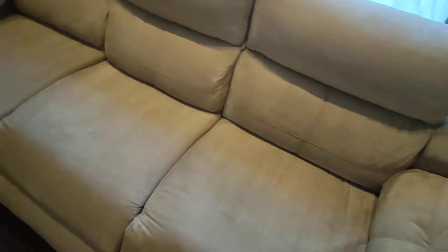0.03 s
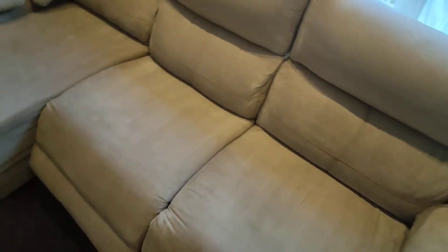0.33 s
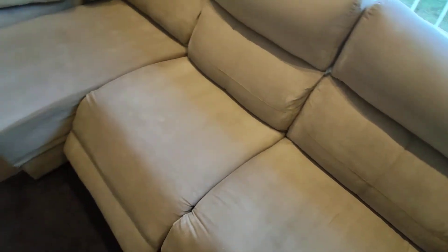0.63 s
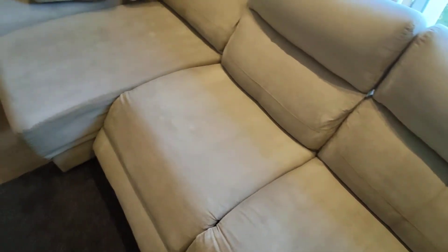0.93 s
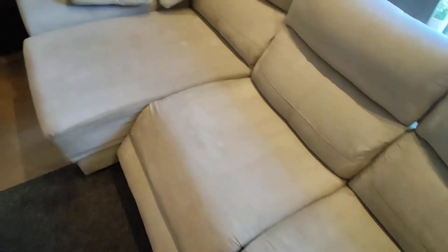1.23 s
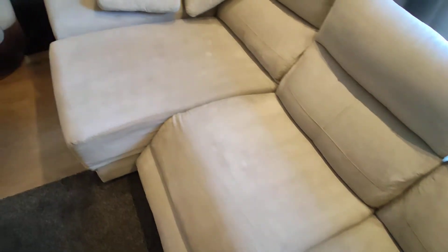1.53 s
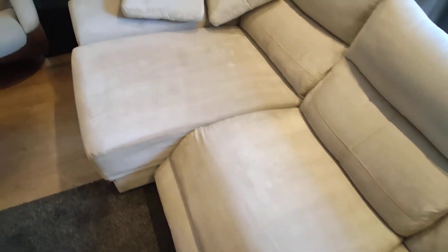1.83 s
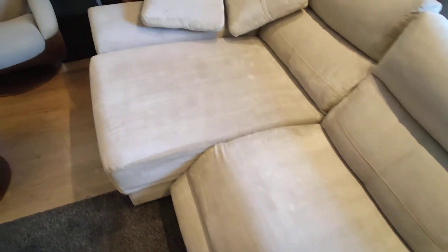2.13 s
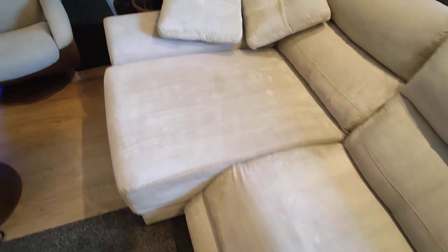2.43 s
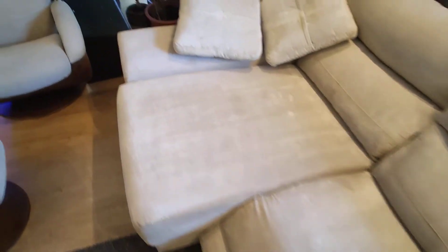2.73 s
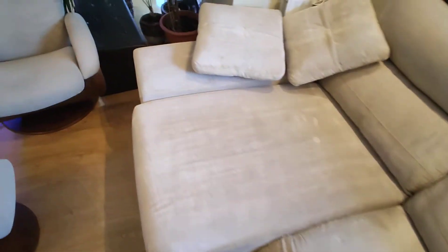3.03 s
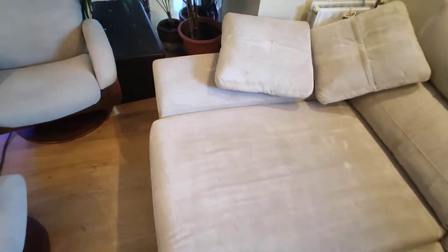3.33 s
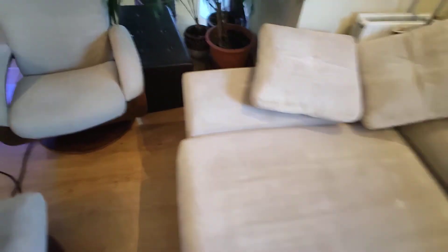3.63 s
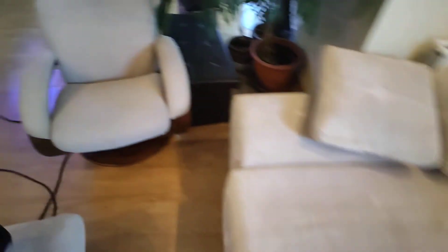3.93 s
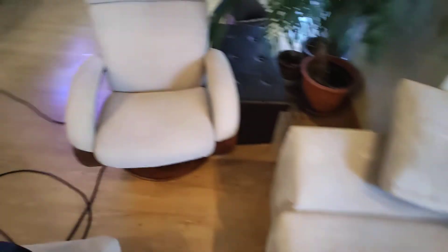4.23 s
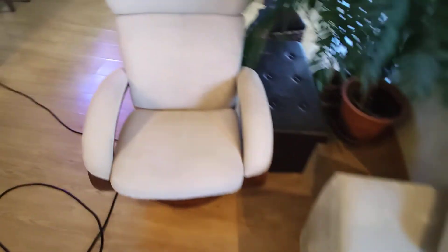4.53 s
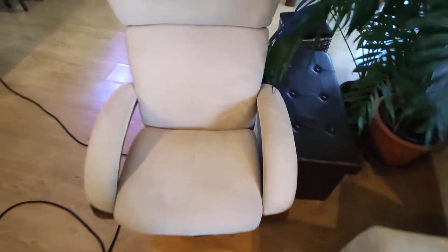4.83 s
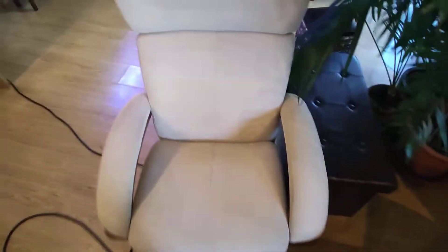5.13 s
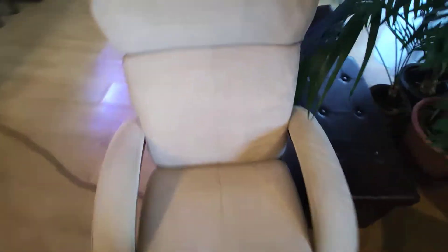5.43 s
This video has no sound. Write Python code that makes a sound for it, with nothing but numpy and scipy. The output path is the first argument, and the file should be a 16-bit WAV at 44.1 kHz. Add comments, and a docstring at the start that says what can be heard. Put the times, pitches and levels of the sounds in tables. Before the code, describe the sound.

A blower runs without a break for nearly six seconds in a furnished living room. Its loud roar of turbulent air is strongest in the low and middle range, with a light hiss on top and narrow room drones underneath. A hand-held stereo microphone is carried past the seats, so the colour slowly shifts. A thin, high, wavering whine surfaces in brief surges throughout, mostly on the right. Soft low buffets reach mainly the left side in the first second, and again from about 3 to 4.4 seconds. After 2 seconds the roar becomes less direct as the microphone turns away. A mid-pitched hum swells from about 3 to 3.7 seconds, then a lower hum rises near 4 seconds and again around 4.7. The roar is fullest at about 3 seconds and eases slightly toward the end, still running.

```python
"""A blower runs in a furnished living room while a hand-held stereo microphone is carried past the seats.
From the start its turbulent roar drives the room's standing waves, and a wavering whine comes and goes.
Soft low buffets reach mainly the left port in the first second, and again later. After 2 s the direct
sound fades as the microphone turns away; near 3 s a hum swells, and near 4 s a lower one.
Throughout, each microphone port colours the sound with its own resonances."""
import sys
import numpy as np
from scipy.fft import rfft, irfft, next_fast_len
from scipy.io import wavfile
from scipy.ndimage import uniform_filter1d, minimum_filter1d

SR = 44100
rng = np.random.default_rng(int(sys.argv[2]) if len(sys.argv) > 2 else 0)


def file_out(sig):
    """Save sig as 16-bit WAV at sys.argv[1]."""
    # one column per channel
    cols = np.atleast_2d(sig).T
    # limit, then scale
    lim = np.clip(cols, -1, 1)
    pcm = np.round(lim * 32767).astype(np.int16)
    wavfile.write(sys.argv[1], SR, pcm)


N = 250929
TIME = np.arange(N) / SR
PADDED = next_fast_len(N + SR // 4)
HZ = np.maximum(np.arange(PADDED // 2 + 1) * SR / PADDED, 1)
SOFT_ENDS = np.sin(np.pi / 2 * np.minimum(np.minimum(TIME, TIME[-1] - TIME) / .003, 1)) ** 2

# spectrum of the turbulent air: f/Hz, relative density level/dB
ROAR_SPECTRUM = [(25, -32), (55, -25), (95, -8.5), (170, 3), (400, 3.5), (730, 4), (900, -0.5),
                 (1200, -1.24), (2000, -9), (2550, -15.5), (3000, -20.5), (4500, -34), (8300, -35.5),
                 (10000, -47.5), (11500, -38.5)]


def from_db(db):
    """Amplitude ratio of a level."""
    return 10 ** (np.asarray(db) / 20)


def rms_one(x):
    """Normalisation to rms 1."""
    return x / np.sqrt(np.mean(x ** 2))


def in_time(rows):
    """Linear interpolation in time, one curve per column."""
    times, *columns = np.transpose(rows)
    return [np.interp(TIME, times, column) for column in columns]


def bell(peak_s, spread_s):
    """Gaussian envelope, 1 at its peak."""
    return np.exp(-.5 * ((TIME - peak_s) / spread_s) ** 2)


def colour(points):
    """Frequency response through (f/Hz, level/dB) points on logarithmic axes."""
    hz, db = np.transpose(points)
    return from_db(np.interp(np.log(HZ), np.log(hz), db))


def high_pass(hz, power):
    """Response that rises with a power of frequency and levels off above hz."""
    return HZ ** power / (HZ ** power + hz ** power)


def resonance(hz, width_hz):
    """Response of a damped oscillator, 1 at resonance."""
    return 1 / (1 + 1j * (HZ ** 2 - hz ** 2) / (HZ * width_hz))


def cavity(peaks):
    """Cavity resonance lifts the sound around each natural frequency."""
    return np.prod([1 + (from_db(db) - 1) * resonance(hz, hz / q) for hz, q, db in peaks], axis=0)


def filtered(x, response):
    """Linear filtering: the spectrum times a frequency response."""
    return irfft(rfft(x * SOFT_ENDS, PADDED) * response, PADDED)[..., :N]


def noise(response):
    """Spectrally shaped Gaussian noise, rms 1."""
    return rms_one(irfft(rfft(rng.standard_normal(PADDED)) * response, PADDED)[:N])


def drift(rate_hz):
    """Slow random fluctuation: low-pass noise, rms 1."""
    return noise(1 / (1 + (HZ / rate_hz) ** 2))


def delayed(x, ms):
    """Propagation delay along a path of changing length."""
    return np.interp(TIME - ms / 1000, TIME, x * SOFT_ENDS, period=N / SR)


def tone(hz):
    """A sine of rms 1 whose phase is the integral of its frequency."""
    return np.sqrt(2) * np.sin(2 * np.pi * (np.cumsum(hz) / SR + rng.random()))


def diffuse_field(null_hz=1900):
    """Roar from all sides is coherent at the two ports in the bass, incoherent in the treble."""
    coherence = np.sinc(HZ / null_hz) / (1 + (HZ / (2 * null_hz)) ** 2)
    mid = filtered(noise(colour(ROAR_SPECTRUM)), np.sqrt((1 + coherence) / 2))
    side = filtered(noise(colour(ROAR_SPECTRUM)), np.sqrt((1 - coherence) / 2))
    return np.array([mid + side, mid - side])


def wall_comb(x):
    """Interference with wall and floor echoes forms a comb that slides as the microphone moves."""
    # echoes: first delay/ms, last delay/ms, level/dB
    surfaces = [(6.18, 10, -20.5), (13.51, 26, -5), (23.78, 21.0, 3.5), (30.65, 36.0, -1)]
    echoes = sum(from_db(db) * delayed(x, np.linspace(first, last, N)) for first, last, db in surfaces)
    return rms_one(x + echoes)


def direct_sound(beam_hz=1150):
    """The upper roar comes from one side; the path difference delays it at the right port."""
    # bearing of the blower: t/s, lag at the right port/ms, level re the diffuse field/dB
    bearing = [(0, 0.37, -4), (1.2, 0.4, -2), (2.2, 0.35, 1), (3.2, 0.25, -3.5), (3.9, 0.31, -5.5),
               (5.69, 0.33, -2)]
    lag_ms, level_db = in_time(bearing)
    air = wall_comb(noise(colour(ROAR_SPECTRUM)))
    at_ports = np.array([air, delayed(air, lag_ms)])
    return from_db(level_db) * filtered(at_ports, high_pass(beam_hz, 2))


def cushion_echo(air, left_db=-7, centre_hz=1250, width_hz=1200):
    """Glancing reflection: a cushion returns the middle frequencies over a changing path."""
    # echo off the nearest furniture: t/s, delay/ms, level/dB
    cushion = [(0, 1.2, -31), (1.15, 1.83, -23), (2.1, 1.87, -13.5), (2.6, 0.95, -30), (3.95, 1.6, -17.5),
               (4.8, 1.54, -25), (5.4, 2, -37)]
    delay_ms, echo_db = in_time(cushion)
    left, right = filtered(air, np.abs(resonance(centre_hz, width_hz)))
    echo = np.array([from_db(left_db) * delayed(left, delay_ms), delayed(right, delay_ms)])
    return from_db(echo_db) * echo


def reflections(x, places=14, decay_s=0.049):
    """Convolution with decaying random echoes, whose pattern changes from place to place on the walk."""
    age_s = TIME[:SR // 4]
    spectrum, position = rfft(x, PADDED), np.linspace(0, places - 1, N)
    out = 0
    for place in range(places):
        tail = rng.standard_normal(len(age_s)) * np.exp(-age_s / decay_s)
        response = rfft(tail / np.linalg.norm(tail), PADDED)
        crossfade = np.cos(np.pi / 2 * np.clip(position - place, -1, 1))
        out = out + crossfade * irfft(spectrum * response, PADDED)[..., :N]
    return out


def reverberant(x, share_db=-9, low_hz=550, high_hz=3500):
    """Reverberation carries part of the middle frequencies; the furniture absorbs its treble."""
    share = from_db(share_db) * high_pass(low_hz, 2) / (1 + (HZ / high_hz) ** 4)
    return filtered(x, np.sqrt(1 - share ** 2)) + reflections(filtered(x, share))


def body_shadow(air, shadow_hz=1750, hiss_hz=4800, left_db=-1.93, left_share=0.18):
    """Acoustic shadow: the turning microphone's body shades the treble, less at the more open left port."""
    # treble at the right port as it faces toward or away from the blower: t/s, level/dB
    facing = [(0, -2), (1.1, -0.5), (2.2, 1.1), (2.9, 2.1), (3.3, 2), (3.8, -1.5), (4.35, 0), (5.69, -2.5)]
    # further gain of the top hiss at that port: t/s, level/dB
    right_hiss = [(0, 2.5), (2.2, -1.5), (3.3, -1.5), (3.9, -3.5), (4.5, -3.3), (5.69, -2.5)]
    facing_db, = in_time(facing)
    hiss_db, = in_time(right_hiss)
    treble_gain = from_db([left_db + left_share * facing_db, facing_db])
    left, right = air + (treble_gain - 1) * filtered(air, high_pass(shadow_hz, 4))
    right = right + (from_db(hiss_db) - 1) * filtered(right, high_pass(hiss_hz, 4))
    return np.array([left, right])


def blower(flutter_db=0.71, flutter_hz=36):
    """Turbulence in a fluttering air stream radiates broadband noise through a duct into the room."""
    # faint resonances of the air passage: f/Hz, Q, level/dB
    duct = [(1045, 17, 2), (1175, 160, 5.5), (2000, 13, 1.5)]
    # roar along the walk: t/s, level/dB
    nearness = [(0, -24), (2.0, -25), (3.2, -23.5), (4.1, -25.5), (4.9, -26), (5.69, -27.5)]
    level_db, = in_time(nearness)
    air = filtered(diffuse_field() + direct_sound(), cavity(duct))
    air = reverberant(air + cushion_echo(air))
    return from_db(level_db + flutter_db * drift(flutter_hz)) * body_shadow(air)


def standing_waves():
    """Room modes drone in narrow bands, each swelling as the microphone passes its antinode."""
    # modes: f/Hz, width/Hz, antinode level/dB, passed at t/s, spread/s, distant level/dB
    room_modes = [(237.6, 20, -33.5, 3.85, 0.14, -47), (262, 19.5, -32.5, 0.47, 2, -42.5),
                  (267, 11, -34.5, 5.23, 0.2, -46), (301.6, 11.3, -33.5, 2.7, 1.9, -48.5),
                  (349, 64, -39.5, 3.3, 0.28, -58), (513, 35, -33.5, .1, 2.9, -44.5),
                  (528.8, 29, -34.5, 2.8, 0.34, -39), (731, 37, -36.5, 0.34, 0.6, -49),
                  (768, 180, -35.5, 3.27, 0.41, -46.5), (847, 44, -35, 2.2, 0.36, -48),
                  (860, 45, -35.5, 3.95, 0.15, -54), (1013, 19, -34.5, 0.13, 0.33, -46),
                  (1074, 45, -36, 1.8, .3, -54), (1080, 80, -35, 3.57, 0.45, -58),
                  (1256, 27, -49, 0.64, 0.31, -52), (1314, 15, -50, 1.1, 0.36, -55.5),
                  (1396, 37, -43, 1.9, 0.28, -52.5), (1633, 28, -46, 3.6, 0.49, -50),
                  (2150, 42, -47, 0.86, .7, -58)]
    out = 0
    for hz, width_hz, near_db, passed_s, spread_s, far_db in room_modes:
        level_db = far_db + (near_db - far_db) * bell(passed_s, spread_s)
        drone = noise(resonance(hz, width_hz) * resonance(hz, 3 * width_hz))
        out = out + from_db(level_db) * drone
    return out


def whine(waver_hz=9.1, waver_rate_hz=14.7, left_db=-11):
    """A thin tone, wavering by frequency modulation, surges out of the roar, glides and sinks back."""
    # surges: t/s, spread/s, f/Hz, glide/(Hz/s), level/dB
    surges = [(0.137, 0.084, 1382, 155, -37), (0.274, 0.047, 1295, 202.5, -40),
              (0.56, 0.053, 1356, -350, -42), (0.61, 0.053, 1255, -200, -37),
              (1.02, 0.05, 1302, -1.5, -38.5), (1.22, 0.053, 1245, -900, -34), (2.12, 0.06, 1362, 1, -41),
              (3.08, 0.13, 1223, 2.5, -37.5), (3.305, 0.037, 1310, 0, -35), (3.523, 0.088, 1368, -350, -41),
              (3.763, 0.021, 1339, -0.5, -39), (3.94, 0.027, 1328, 100, -35),
              (4.626, 0.025, 1272, -0.5, -36.5), (4.906, 0.071, 1305, 400, -39),
              (5.377, 0.05, 1400, -0.5, -42)]
    out, waver = 0, waver_hz * drift(waver_rate_hz)
    for peak_s, spread_s, hz, glide, db in surges:
        pitch_hz = hz + glide * (TIME - peak_s) + waver
        out = out + from_db(db) * bell(peak_s, spread_s) * tone(pitch_hz)
    return from_db([[left_db], [0]]) * out


def buffets(right_db=-8):
    """Amplitude-modulated low noise: short swells of rumble, incoherent between the ports."""
    # swells: t/s, spread/s, level/dB
    swells = [(0.349, 0.039, -29.5), (0.555, 0.27, -36.5), (0.828, 0.037, -34), (3.344, 0.23, -39.5),
              (3.895, 0.02, -30), (4.353, 0.03, -39)]
    # rumble: f/Hz, relative density level/dB
    spectrum = [(20, -32), (40, -20.5), (62, -10), (100, 1.5), (160, -3), (260, -6), (600, -63)]
    envelope = sum(from_db(db) * bell(peak_s, spread_s) for peak_s, spread_s, db in swells)
    rumble = colour(spectrum)
    return envelope * np.array([noise(rumble), from_db(right_db) * noise(rumble)])


def hums(low_hz=230.8, high_hz=526, waver_share=0.00998, flutter_db=2.5, rate_hz=7):
    """Two tones, each localised in one part of the room, with slight random level and pitch modulation."""
    # higher hum, at the end of the sofa: t/s, level/dB
    by_sofa = [(0, -60), (2.85, -47), (3.15, -31), (3.55, -31.5), (3.75, -36.5), (4.1, -48), (5.69, -60)]
    # lower hum, near the armchair: t/s, level/dB
    by_armchair = [(0, -70), (3.5, -53), (3.72, -43), (3.95, -34), (4.15, -41), (4.4, -40.5), (4.7, -30.5),
                   (5.1, -42), (5.4, -37.5), (5.69, -45.5)]
    out = 0
    for levels, hz in (by_armchair, low_hz), (by_sofa, high_hz):
        level_db, = in_time(levels)
        amplitude = from_db(level_db + flutter_db * drift(rate_hz))
        out = out + amplitude * tone(hz * (1 + waver_share * drift(rate_hz)))
    return out


def limited(x, ceiling=.86, window=129):
    """Peak limiting: the gain ducks for an instant around peaks above the ceiling."""
    allowed = ceiling / np.maximum(np.abs(x).max(axis=0), ceiling)
    return x * uniform_filter1d(minimum_filter1d(allowed, window), window)


def scene():
    """Superposition of the sources at the two ports."""
    roar = blower() + whine()
    drones = from_db([[-1], [0]]) * (standing_waves() + hums())  # a little weaker on the left
    return roar + drones + buffets()


def record(dry, cutoff_hz=11600):
    """Port resonances colour each channel; peaks are limited and a steep low-pass cuts the top."""
    # resonances of each port: f/Hz, Q, level/dB
    left_port = [(7320, 8.9, 17), (6030, 1.23, 6)]
    right_port = [(1343, 5.23, 19.5), (6220, 12.8, 19), (7000, 16.3, 11.5), (9160, 60, 18.5)]
    # broad response of the right microphone: f/Hz, level/dB
    right_colour = [(25, -17), (60, -39), (125, -18), (180, -2), (240, 0), (600, 0), (1500, 0.5),
                    (2300, -4), (4000, 0), (4700, -5), (8000, 0.5), (9200, -4.5), (11500, 1.5)]
    microphones = np.array([cavity(left_port), cavity(right_port) * colour(right_colour)])
    low_pass = 1 / np.sqrt(1 + (HZ / cutoff_hz) ** 300)
    return filtered(limited(filtered(dry, microphones)), low_pass)


dry = scene()
out = record(dry)
file_out(out)
```